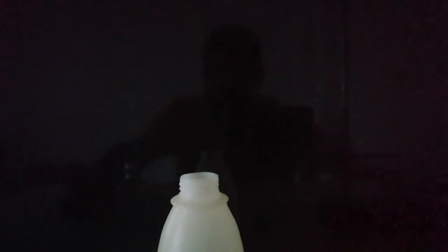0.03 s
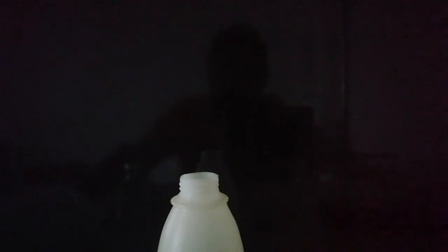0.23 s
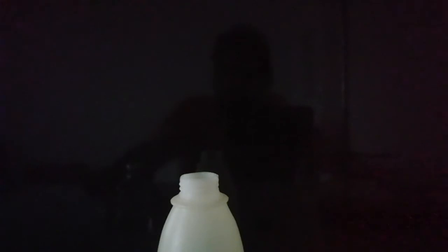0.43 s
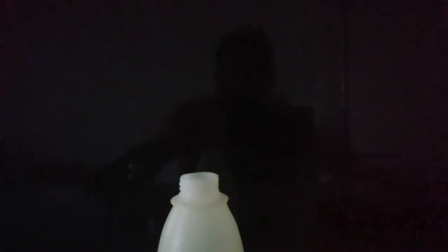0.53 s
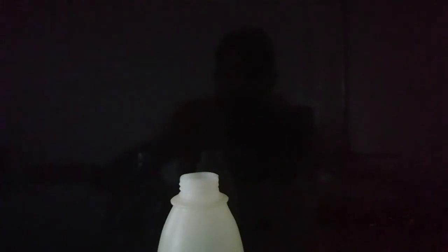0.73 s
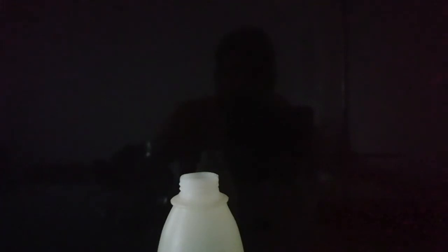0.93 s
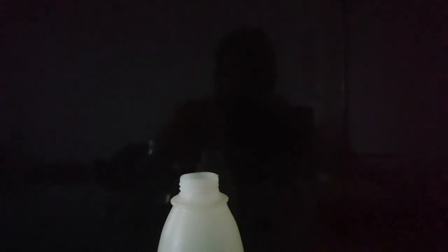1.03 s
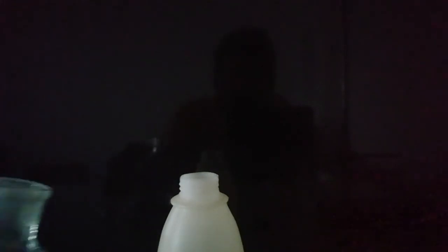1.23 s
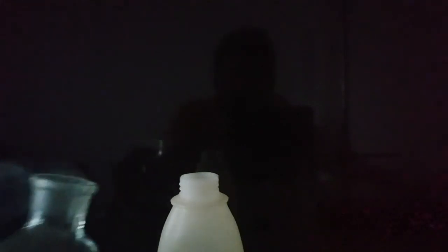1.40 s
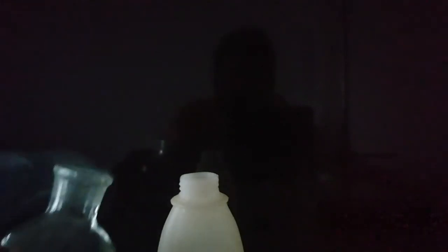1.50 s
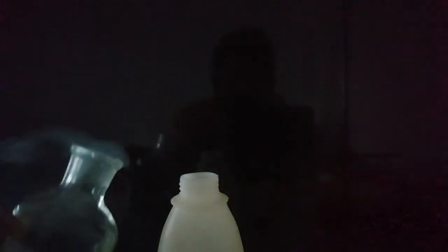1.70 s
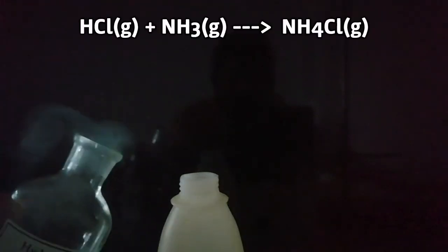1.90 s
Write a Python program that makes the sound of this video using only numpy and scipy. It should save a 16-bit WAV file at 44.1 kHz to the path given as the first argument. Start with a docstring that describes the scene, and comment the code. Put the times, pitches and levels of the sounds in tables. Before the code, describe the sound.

One sharp pop follows a soft click and echoes briefly off hard walls over faint hiss.

```python
"""A quiet, hard-walled room rumbles under a wavering drone, a weak hum and microphone hiss.
At 0.09 s, close by on the left, a small hard part snaps over and its damped modes give a soft click.
At 0.25 s one pressure pulse makes a small sharp pop, the main sound. Nearby surfaces and the walls
return distinct reflections, then a short bright reverberation. As it dies a tiny tick rings at 0.71 s,
and from 1.63 s a faint high fizz joins the background."""
import sys
import numpy as np
from scipy import signal
from scipy.fft import rfft, irfft, next_fast_len
from scipy.io import wavfile

SR = 44100
rng = np.random.default_rng(int(sys.argv[2]) if len(sys.argv) > 2 else 0)


def generate_wav(signal):
    """Clip the signal to [-1, 1] and save it as 16-bit WAV at the path in sys.argv[1]."""
    frames = np.transpose(np.atleast_2d(signal))
    scaled = np.clip(frames, -1, 1) * 32767
    pcm = np.round(scaled).astype(np.int16)
    wavfile.write(sys.argv[1], SR, pcm)


N = 85995


# Spectrum of the pressure pulse: f/Hz, relative level/dB
POP_SPECTRUM = [(200, -38.5), (600, -30.5), (1200, -19.5), (2200, -21), (3400, -14.5), (4500, -9.5),
                (5700, 2), (6800, 1), (8200, -3), (9200, -10.5), (10500, -20.5), (13000, -23.5),
                (16000, -31)]
def pop():
    """Impulsive radiation: one brief pressure pulse has a broad spectrum, here peaking near 6 kHz."""
    return in_room(amp(1.5) * pulse(POP_SPECTRUM), start_s=.2479, walls_db=-2.5, reverb_db=3)


# Modes of the hard part: f/Hz, relative level/dB, T60/s
PART_MODES = [(1400, -8, .003), (1850, -6, .005), (3580, -1, .006), (5000, 4, .0038), (8350, 0, .003)]
# Spectrum of its contact: f/Hz, relative level/dB
CONTACT_SPECTRUM = [(200, -36.5), (550, -20), (1100, -5.5), (4200, 6), (8500, 10.5), (16000, -40)]
def click():
    """Impact excitation: a small hard part snaps over and rings briefly, radiating no bass."""
    impact = ring(PART_MODES) + amp(-10) * pulse(CONTACT_SPECTRUM)
    passband = signal.butter(4, [868, 9600], "bandpass", fs=SR, output="sos")
    radiated = signal.sosfilt(passband, impact)
    return in_room(amp(-19.5) * radiated, start_s=.0867, walls_db=-8, reverb_db=-1.5)


def tick(hz=8410, t60_s=.0073):
    """Damped oscillation: a single high mode dies within milliseconds."""
    return in_room(amp(-42.5) * ring([(hz, 0, t60_s)]), start_s=.708, walls_db=-5.5, reverb_db=-3.5)


def pulse(spectrum, size=4096):
    """Minimum phase: a pulse of energy 1 that arrives as early as its spectrum allows."""
    magnitude = gain(spectrum, np.fft.rfftfreq(size, 1 / SR))
    cepstrum = irfft(np.log(magnitude))
    cepstrum[1:size // 2] *= 2  # folding onto positive time makes the pulse causal
    cepstrum[size // 2 + 1:] = 0
    pressure = irfft(np.exp(rfft(cepstrum)))
    return np.pad(pressure, (0, N - size)) / np.linalg.norm(pressure)


def ring(modes):
    """Modal superposition: exponentially damped sines start together, with total energy 1."""
    t = np.arange(N) / SR
    x = sum(amp(db - 60 * t / t60) * np.sin(2 * np.pi * hz * t) for hz, db, t60 in modes)
    return x / np.linalg.norm(x)


def in_room(x, start_s, walls_db, reverb_db):
    """Multipath propagation: direct sound, later and weaker on the right, then reflections and tails."""
    direct = filtered(x, lambda hz: np.array([delay(hz, 0), amp(-3.5) * delay(hz, .0004)]))
    reflected = amp(walls_db) * (near_reflections(x) + far_reflections(x))
    tail_response = amp(walls_db) * scatter() + amp(reverb_db) * reverberation()
    tails = signal.fftconvolve(x[None], tail_response, axes=1)[:, :N]
    return np.pad(direct + reflected + tails, ((0, 0), (round(start_s * SR), 0)))[:, :N]


# Delay from each nearby surface: t/s
NEAR_DELAYS = [.0005, .0025, .003, .0075, .0154]
# Their reflections: left relative level/dB, right relative level/dB, right lag t/s
NEAR_RETURNS = [(-9, -15, .0006), (-9, -14, .0005), (-2, -6, .0002), (-7, -10, .0001), (-8, -15, .0005)]
def near_reflections(x):
    """Group delay: the sound the source sends off-axis rings on around 6.4 kHz (all-pass filtered), and nearby
    surfaces return it."""
    smeared = filtered(x, lambda hz: 1 - 2 * resonance(hz, centre_hz=6400, width_hz=2000))
    return reflect(smeared, NEAR_DELAYS, NEAR_RETURNS)


# Delay from each far wall: t/s
FAR_DELAYS = [.0381, .06]
# Their reflections: left relative level/dB, right relative level/dB, right lag t/s
FAR_RETURNS = [(-6.5, -12, 0.00037), (-8, -16, 0.00026)]
# Response of the far walls: f/Hz, relative level/dB
FAR_SPECTRUM = [(500, -10.5), (1000, -14), (2300, -3), (3400, 7.5), (4600, 9), (6500, -6.5), (12000, 10)]
def far_reflections(x):
    """Frequency-dependent reflection: the far walls return two later, coloured copies."""
    return reflect(coloured(x, FAR_SPECTRUM), FAR_DELAYS, FAR_RETURNS)


def reflect(x, delays_s, returns):
    """Specular reflection: each surface adds one delayed stereo copy."""
    return filtered(x, lambda hz: sum(
        np.array([amp(left_db) * delay(hz, s), amp(right_db) * delay(hz, s + lag_s)])
        for s, (left_db, right_db, lag_s) in zip(delays_s, returns)))


# Spectrum of the scattered sound: f/Hz, relative level/dB
SCATTER_SPECTRUM = [(500, -1), (1100, -5), (3400, -0.5), (4600, 0), (6500, -1)]
def scatter(t60_s=.06):
    """Scattering: nearby objects give a dense, very short impulse response."""
    return amp(2) * coloured(diffuse([(1, t60_s)], rise_s=.002), SCATTER_SPECTRUM)


# Reverberation time: f/Hz, T60/s before the decay steepens
REVERB_TIMES = [(300, 1), (1500, 0.61), (4000, 0.8), (6200, 0.78), (8200, 0.68), (11000, 0.46),
                (15000, .48)]
# Spectrum of the reverberation: f/Hz, relative level/dB
REVERB_SPECTRUM = [(300, -6.5), (1200, -2.5), (3000, 1), (4500, -2.5), (5800, -8), (8000, -3.5),
                   (14000, -1)]
def reverberation(rise_s=.026, linger_t60_s=1.0):
    """Repeated reflection: hard walls give a bright impulse response in which one narrow band lingers."""
    broad = coloured(diffuse(REVERB_TIMES, rise_s), REVERB_SPECTRUM)
    slow_tail = diffuse([(1, linger_t60_s)], rise_s)
    linger = filtered(slow_tail, lambda hz: resonance(hz, centre_hz=6180, width_hz=330))
    return broad + amp(-11) * linger


def diffuse(t60, rise_s, knee_s=.22, drop_db_per_s=54):
    """Diffuse field: noise of energy 1 a side builds, decays band by band, and steepens past the knee."""
    hz, frame_s, bands = signal.stft(rng.standard_normal((2, N)), SR, nperseg=256)
    decay = amp(-60 * frame_s / along(t60, hz)[:, None])
    tail = signal.istft(bands * decay, SR, nperseg=256)[1][:, :N]
    t = np.arange(N) / SR
    tail *= 1 - np.exp(-t / rise_s)
    tail *= amp(-drop_db_per_s * np.maximum(t - knee_s, 0))
    return tail / np.linalg.norm(tail, axis=1, keepdims=True)


# Spectral densities of rumble and drone: f/Hz, relative level/dB
RUMBLE_SPECTRUM = [(20, -11), (31, -8), (39, -8), (49, 7), (62, -5.5), (79, -8), (105, -7.5), (140, -11),
                   (175, -20), (300, -27), (400, -29), (700, -31), (2000, -79.5)]
DRONE_SPECTRUM = [(60, -45), (150, -10.5), (168, -27), (188, 5.5), (208, -8.5), (232, 2), (270, -9),
                  (310, -8), (370, -50.5), (600, -69.5)]
# Left-right correlation of both: f/Hz, coefficient
LOW_CORRELATION = [(40, 1), (70, 0.99), (120, 1), (250, 0.83), (500, -0.36)]
# Envelope of the drone: t/s, rms level/dB
DRONE_ENVELOPE = [(0, -65.5), (.4, -61.5), (.75, -64), (1.0, -68), (1.15, -64.5), (1.3, -67.5),
                  (1.95, -68.5)]
# Hum tones: f/Hz, rms level/dB
HUM_LINES = [(49.5, -69), (190, -75)]
def room_tone():
    """Continuous and line spectra: steady rumble, two hum tones and an amplitude-modulated drone."""
    t = np.arange(N) / SR
    rumble = amp(-58.5) * noise(RUMBLE_SPECTRUM, LOW_CORRELATION)
    hum = sum(amp(db) * np.sqrt(2) * np.sin(2 * np.pi * (hz * t + rng.random())) for hz, db in HUM_LINES)
    drone_db = np.interp(t, *np.transpose(DRONE_ENVELOPE))
    return rumble + hum + amp(drone_db) * noise(DRONE_SPECTRUM, LOW_CORRELATION)


# Spectral densities of hiss and fizz: f/Hz, relative level/dB
HISS_SPECTRUM = [(30, 8.5), (400, -1), (700, -1.5), (1000, 1), (1350, 3), (2000, -1.5), (3300, -0.5),
                 (4500, -1.5), (5600, -5), (7000, -3), (8200, 1), (9200, -5.5), (10300, -11.5),
                 (15500, -14)]
FIZZ_SPECTRUM = [(4000, -31), (5800, -9), (6800, -3), (8100, -4), (9200, -16), (12000, -42.5)]
# Left-right correlation of both: f/Hz, coefficient
HISS_CORRELATION = [(250, 0.41), (520, -0.46), (1000, .1), (2000, -0.062), (10000, -0.048)]
def hiss_and_fizz(fizz_start_s=1.63, fizz_rise_s=.13):
    """Broadband noise: the microphones hiss steadily, and a faint high fizz fades in late."""
    t = np.arange(N) / SR
    hiss = amp(-69.5) * noise(HISS_SPECTRUM, HISS_CORRELATION)
    fade_in = np.clip((t - fizz_start_s) / fizz_rise_s, 0, 1)
    return hiss + amp(-76.5) * fade_in * noise(FIZZ_SPECTRUM, HISS_CORRELATION)


def noise(spectrum, correlation):
    """Partial coherence: independent mid and side noises mix to a stereo pair of rms 1."""
    def mid_side_gains(hz):
        angle = np.arccos(np.clip(along(correlation, hz), -1, 1)) / 2
        return gain(spectrum, hz) * [np.cos(angle), np.sin(angle)]
    mid, side = filtered(rng.standard_normal((2, N)), mid_side_gains)
    stereo = np.array([mid + side, mid - side])
    return stereo / np.sqrt(np.mean(stereo ** 2) + 1e-20)


def amp(db):
    """Amplitude ratio of a level in decibels."""
    return 10 ** (np.asarray(db) / 20)


def along(points, hz):
    """Interpolation of (f/Hz, value) points on a logarithmic frequency axis."""
    f, values = np.transpose(points)
    return np.interp(np.log(hz + 1), np.log(f + 1), values)


def gain(spectrum, hz):
    """Magnitude response through (f/Hz, level/dB) points."""
    return amp(along(spectrum, hz))


def delay(hz, s):
    """Pure delay: phase lag proportional to frequency."""
    return np.exp(-2j * np.pi * hz * s)


def resonance(hz, centre_hz, width_hz):
    """Band-pass response of a second-order resonator."""
    return 1j * hz * width_hz / (centre_hz ** 2 - hz ** 2 + 1j * hz * width_hz)


def filtered(x, response):
    """Convolution theorem: filtering multiplies the spectrum by a frequency response."""
    size = next_fast_len(N + SR // 2)
    hz = np.fft.rfftfreq(size, 1 / SR)
    return irfft(rfft(x, size) * response(hz), size)[..., :N]


def coloured(x, spectrum):
    """Zero-phase filtering: only the magnitudes change."""
    return filtered(x, lambda hz: gain(spectrum, hz))


def scene():
    """Superposition: click, pop and tick add to the quiet background."""
    return click() + pop() + tick() + room_tone() + hiss_and_fizz()


def record(dry, top_hz=16000):
    """Band limiting: the camera passes nothing above its top frequency."""
    return filtered(dry, lambda hz: hz < top_hz)


dry = scene()
out = record(dry)
generate_wav(out)
```